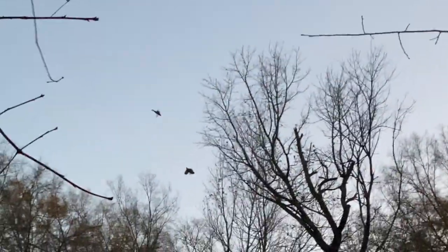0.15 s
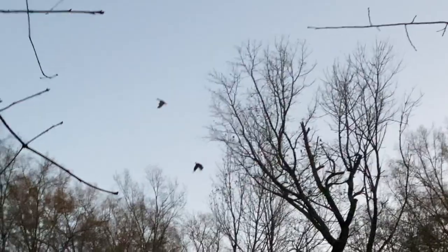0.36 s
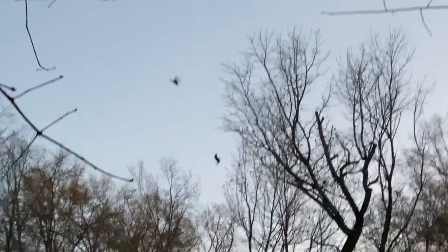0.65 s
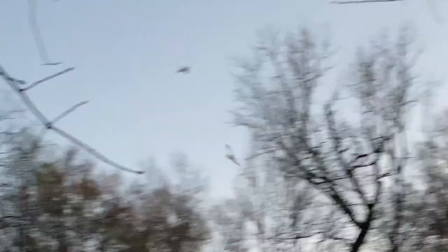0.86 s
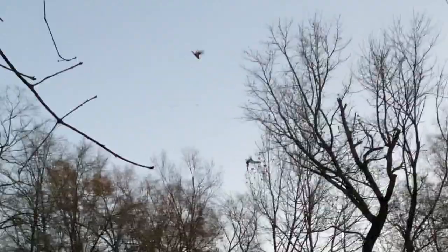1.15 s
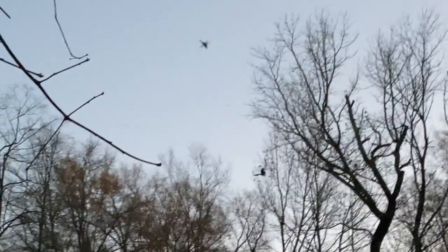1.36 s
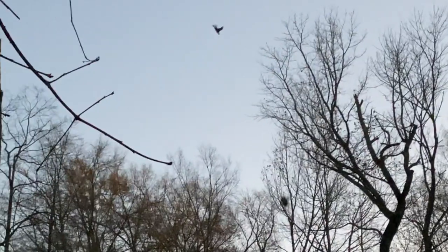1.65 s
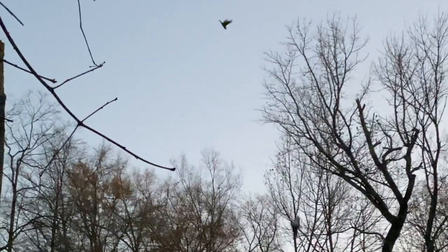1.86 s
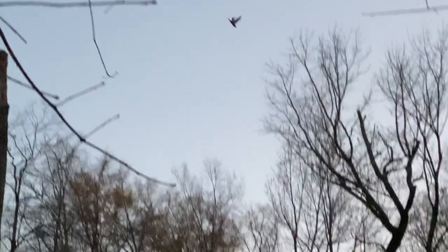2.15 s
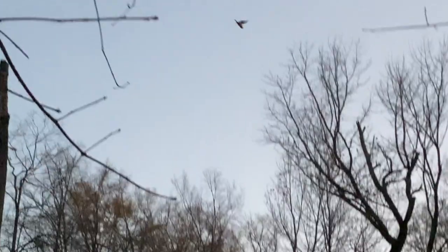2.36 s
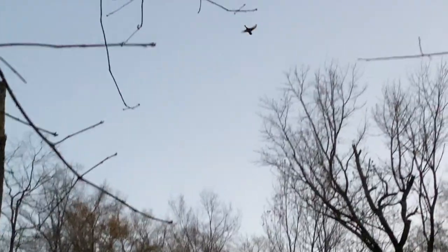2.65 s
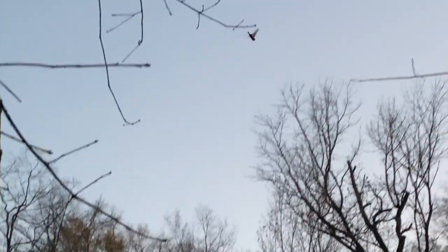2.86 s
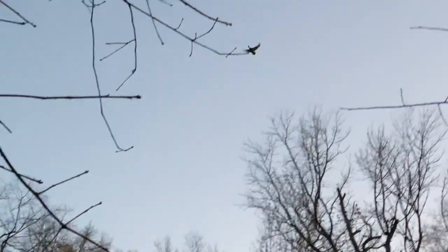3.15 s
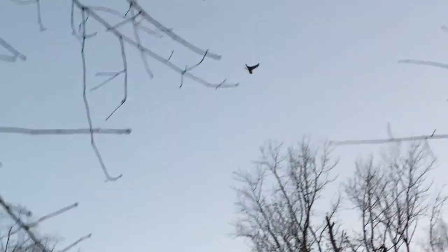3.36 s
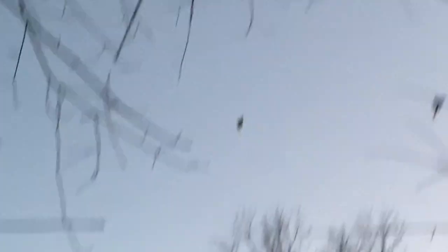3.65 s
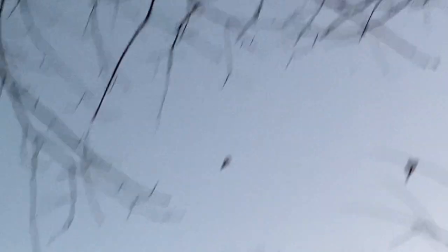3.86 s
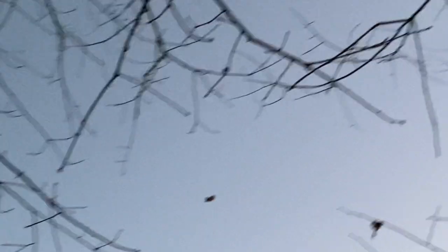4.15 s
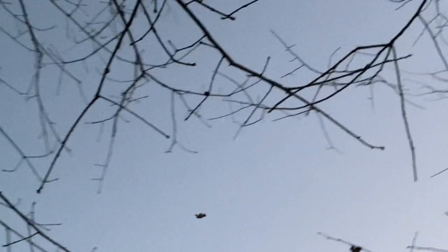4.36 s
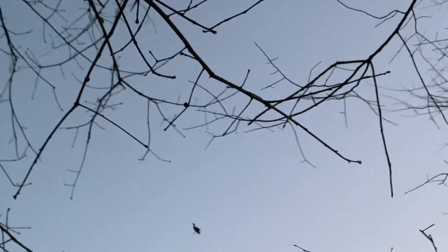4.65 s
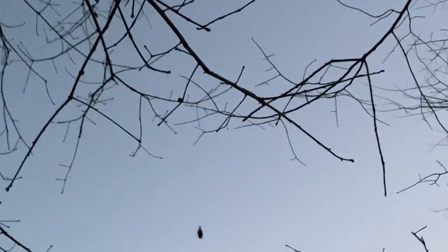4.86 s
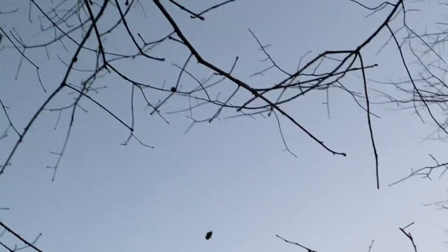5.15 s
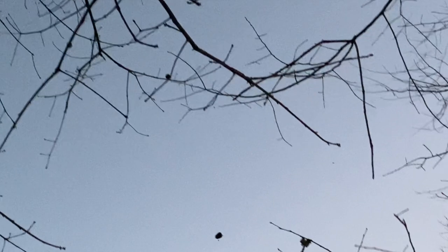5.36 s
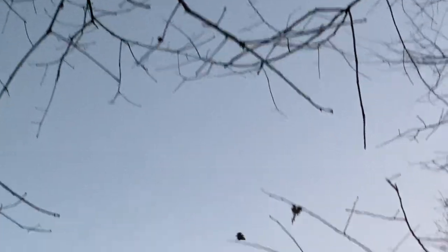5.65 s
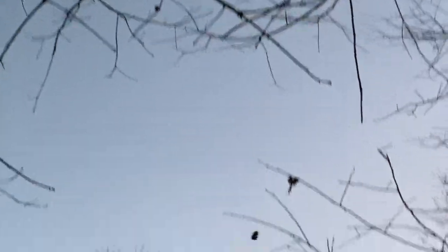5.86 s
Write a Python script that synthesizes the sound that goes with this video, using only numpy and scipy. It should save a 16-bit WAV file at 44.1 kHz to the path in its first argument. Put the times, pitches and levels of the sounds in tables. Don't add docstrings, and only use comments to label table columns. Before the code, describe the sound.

In a bare, flooded wood, five shotgun blasts: one alone, a pause filled by fading rumble, a softer dull shot followed immediately by a deep strong one, then a strong shot and a brighter, thinner one. Trunks and water scatter each into a wide roll that loses its highs first. Quiet hiss beneath; birds flying overhead are not heard. Small stereo microphone in the open.

```python
import sys
import numpy as np
from scipy import signal
from scipy.fft import rfft, irfft, next_fast_len
from scipy.io import wavfile

SR = 44100
rng = np.random.default_rng(int(sys.argv[2]) if len(sys.argv) > 2 else 0)


def wav_out(sig):
    wavfile.write(sys.argv[1], SR, np.round(np.clip(np.atleast_2d(sig).T, -1, 1) * 32767).astype(np.int16))


def natural_amplitude(level_db):
    exponent = np.asarray(level_db, float) / 20
    return 10 ** exponent


N = 264908

# frequency in Hz, density in dB per Hz.
STILL_AIR = [(1200, -38.5), (2200, -10), (3500, 2.5), (4600, -8), (6000, -9), (7500, -28.5), (9500, -39.5)]
# frequency in Hz, density in dB per Hz.
ROLL_COLOUR = [(25.0, -24.2), (50.0, -9.7), (120.0, -0.6), (200.0, -8.7), (450.0, -8.4), (760.0, -13.0),
               (1200.0, -16.1), (1700.0, -20.6), (2600.0, -26.9), (3600.0, -24.8), (4700.0, -34.5),
               (6000.0, -38.1), (8000.0, -43.0), (10000.0, -48.0)]
# frequency in Hz, shared share from 0 to 1.
COHERENCE = [(30, 0.4), (70, 1), (130, 0.91), (250, 0.22), (600, 0.29), (1200, 0.7), (1800, 0), (2500, 0),
             (3500, 0), (4000, 0.3), (4500, .85)]
# frequency in Hz, left minus right in dB.
ROLL_BALANCE = [(60, -3.1), (130, 1), (300, -1), (900, -1.5), (1500, -1), (2400, 9), (3300, -1),
                (4000, -5.5)]
# frequency in Hz, fade in dB/s.
FADE = [(60.0, 6.2), (150.0, 7.9), (700.0, 11.8), (1500.0, 17.4), (2750.0, 27.4), (5400.0, 47.5),
        (9000.0, 56.4)]
# start in seconds, level in dB, age in seconds at which it has
# the plain colour, gain drop in dB.
ROLLS = [
    (-2.0, -4.4, 0.06, 0.1),
    (0.094, 0.1, 0.26, 20.4),
    (2.918, 0.9, 0.04, 7.0),
    (3.127, -13.8, 0.4, 12.4),
    (4.61, -8.8, 0.12, 7.3),
    (4.854, -7.0, 0.22, 12.2),
]
# start in seconds, level in dB, own fade in dB/s, freshness in
# seconds, # swell in dB/s.
SCATTER = [(0.082, -9.0, 45.0, -0.3, 2600.0), (0.097, 9.6, 222.0, 0.07, 5402.0),
           (0.139, -5.4, 152.0, 0.35, 2929.0), (0.288, -0.8, 113.0, -0.58, 4107.0),
           (0.381, -5.9, 119.0, -0.44, 682.0), (0.48, 2.3, 112.0, -0.28, 3119.0),
           (0.668, -6.5, 13.0, 0.02, 4111.0), (0.793, -8.5, 1.0, 0.04, 78.0),
           (1.1, -10.4, 179.0, -0.32, 4008.0), (2.921, 3.9, 1041.0, 0.1, 4115.0),
           (3.127, 19.0, 800.0, -0.15, 5678.0), (3.147, 1.0, 77.0, 0.27, 3011.0),
           (3.178, -0.5, 293.0, 0.04, 939.0), (3.325, 1.7, 246.0, -0.15, 3434.0),
           (3.619, -3.8, 21.0, -0.24, 164.0), (3.877, -5.4, 25.0, -0.54, 26.0),
           (4.612, 17.8, 845.0, 0.03, 4946.0), (4.631, -2.0, 35.0, 0.11, 4017.0),
           (4.842, 1.5, 100.0, -0.4, 500.0), (4.857, 12.7, 236.0, 0.2, 5841.0),
           (4.902, 1.6, 35.0, 0.12, 4095.0), (4.985, 4.6, 602.0, -0.02, 3781.0),
           (5.278, -5.3, 10.0, -0.23, 139.0), (5.468, -1.7, 13.0, -0.4, 98.0)]
# blast in seconds, lead in seconds, frequency in Hz, width in Hz,
# level in dB.
SWELLS = [
    (.094, 0.024, 3700, 600, -45),
    (2.92, 0.027, 3420, 500, -49.5),
    (4.6095, .06, 4000, 40, -54),
]
# start in seconds, boom in dB, bottom of boom in Hz, top of boom in Hz,
# crack ring in dB.
BLASTS = [
    (.094, -4.5, 50.5, 200, -6),
    (2.918, -10.5, 57, 480, -20.5),
    (3.1272, -4, 42, 353, -15.5),
    (4.6099, -5, 80, 290, -10),
    (4.854, -5.5, 250, 594, -6.5),
]
# left minus right in dB, one per blast.
BLAST_PAN_DB = [3.5, -1.5, 3.5, 0.6, -4]
# start in seconds, boom in dB,
# bottom of boom in Hz, top of boom in Hz, crack ring in dB.
SLAPS = [(0.122, -29.5, 99.6, 300, -11), (.146, -12.5, 200, 608, -23), (.287, -11.5, 250, 510, -37),
         (0.667, -15.5, 59.6, 316, -22.5), (2.995, -21.5, 81.4, 488, -23), (3.032, -12, 90, 250, -31),
         (3.183, -15, 200, 780, -17), (3.596, -15, 150, 915, -23), (4.621, -24.5, 101, 299, -11.5),
         (4.858, -3, 34, 170, -30), (4.903, -5, 250, 800, -16.5), (4.986, -21, 144.6, 600, -21)]
# centre in Hz, width in Hz, level in dB.
CRACK_RINGS = [(1200, 250, 11.5), (3200, 2000, -13.5), (4300, 880, -17), (8400, 3600, -29.5)]
# from in Hz, to in Hz.
SUM_GAPS = [(6520, 6900), (9130, 10500), (9400, 10500)]
# from in Hz, to in Hz.
DIFFERENCE_GAPS = [(5280, 5660), (7720, 8250)]

STEP = 32
STILL_AIR_DB = -77.3
RECOVER_DB_PER_S = 32.6
LOW_LUMPS = .15
LOW_LEAD_S, HIGH_LAG_S, HIGH_TURN = .00082, .0004, .18
SPLIT_HZ, SHARED_HZ = 1950, 4700
LAG_CYCLES, LAG_TURN = 1.4, 1.38
CEILING, CUTOFF_HZ = .95, 9720


def at_hz(points, hz):
    table = np.array(points)
    return np.interp(np.log(hz), np.log(table[:, 0]), table[:, 1])


def drift(rate_hz):
    pole = np.exp(-2 * np.pi * STEP * rate_hz / SR)
    noise = rng.standard_normal(N // STEP + 2001)
    slow = signal.lfilter([1], [1, -2 * pole, pole * pole], noise)[2000:]
    return slow / slow.std()


def two_microphones(spectrum, hz):
    low = hz < SPLIT_HZ
    left = np.exp(-2j * np.pi * (hz * HIGH_LAG_S - HIGH_TURN) * ~low)
    right = np.exp(-2j * np.pi * hz * LOW_LEAD_S * low)
    return spectrum * np.array([left, right])


def band_pass(x, order, low_hz, high_hz):
    return signal.sosfilt(signal.butter(order, [low_hz, high_hz], "band", fs=SR, output="sos"), x)


def returning_db(t, hz):
    fade = at_hz(FADE, hz)
    s, db, plain_s, drop_db = np.array(ROLLS).T[:, :, None]
    age = t - s
    drop_left_db = np.maximum(drop_db - RECOVER_DB_PER_S * age, 0)
    gain_db = -np.max(np.where(age > 0, drop_left_db, 0), axis=0)
    roll_db = db - fade * (np.maximum(age, 0) - plain_s) + gain_db
    roll_power = np.sum((age > 0) * natural_amplitude(2 * roll_db), axis=0)

    s, db, own_fade, fresh_s, swell = np.array(SCATTER).T[:, :, None]
    age = t - s
    loss_db = np.where(age > 0, (fade + np.abs(own_fade)) * age, -np.abs(swell) * age)
    burst_power = np.sum(natural_amplitude(2 * (db + fade * fresh_s - loss_db)), axis=0)
    return 10 * np.log10(roll_power + burst_power)


def roll(lumps_db, flutter_db, boom_wait_s):
    t = np.arange(N // STEP + 1) * STEP / SR
    starts = np.array([-1] + [blast[0] for blast in BLASTS])
    since = t - starts[np.searchsorted(starts, t) - 1]
    size = next_fast_len(N)
    hz_all = np.arange(size // 2 + 1) * SR / size
    shared = [irfft(two_microphones(rfft(rng.standard_normal(size)), hz_all), size)[:, :N] for _ in range(2)]
    own = rng.standard_normal((2, 2, N))
    out = 0
    together = drift(9.0)
    edges = 24 * 2 ** (np.arange(37) / 4)
    for k, (low, high) in enumerate(zip(edges, edges[1:])):
        hz = np.sqrt(low * high)
        apart = hz < SHARED_HZ
        alike = np.clip(at_hz(COHERENCE, hz), 0, 1) if apart else 1
        mix = np.sqrt(alike) * shared[k % 2] + np.sqrt(1 - alike) * own[k % 2]
        run_in = mix[:, -8192:]
        band = band_pass(np.hstack([run_in, mix]), 3, low, high)[:, 8192:]
        flutter = flutter_db * (1 + LOW_LUMPS * (hz < 900)) * drift(6.7)
        level_db = returning_db(t, hz) + at_hz(ROLL_COLOUR, hz) + lumps_db * together + flutter
        wait = 1 - np.exp(-(since * hz / (100 * boom_wait_s)) ** 4)
        still_air = natural_amplitude(STILL_AIR_DB + at_hz(STILL_AIR, hz) + 7.5)
        gain = np.hypot(natural_amplitude(level_db) * wait, still_air)
        side = natural_amplitude(apart * at_hz(ROLL_BALANCE, hz) / 2 * np.array([[1], [-1]]))
        out = out + band * side * np.interp(np.arange(N) / STEP, np.arange(len(t)), gain)
    return out


def swells():
    out = np.zeros((2, N))
    for s, lead_s, hz, width_hz, db in SWELLS:
        end, size = round(s * SR), round(lead_s * SR)
        noise = rng.standard_normal((2, 4096))
        narrow = band_pass(noise, 2, hz - width_hz / 2, hz + width_hz / 2)
        swell = np.sin(np.linspace(0, np.pi / 2, size))
        out[:, end - size:end] += natural_amplitude(db) * narrow[:, -size:] / narrow.std() * swell
    return out


def bang(boom_db, bottom_hz, top_hz, crack_db, pan_db, size=8192):
    hz = np.maximum(np.arange(size // 2 + 1), 1) * SR / size
    sweep = np.exp(-2j * np.pi * (LAG_CYCLES * np.log(hz / 130) + LAG_TURN - hz * .0009))
    colour = (hz / 100) ** -.55 / (1 + (hz / top_hz) ** 3) / (1 + (bottom_hz / hz) ** 3)
    lean = natural_amplitude(pan_db / 2 * np.array([[1], [-1]]))
    boom = irfft(two_microphones(colour * sweep, hz)) * lean

    rings = sum(natural_amplitude(db) * np.exp(-2 * ((hz - centre) / width) ** 2) for centre, width, db in CRACK_RINGS)
    splinters = rng.standard_normal(size) * np.exp(-np.arange(size) / (0.001 * SR))
    splinters[round(.0022 * SR)] += 9.0
    crack = irfft(two_microphones(rings * rfft(splinters), hz))
    both = natural_amplitude(boom_db) * boom / np.abs(boom).max() + natural_amplitude(crack_db) * crack / np.abs(crack).max()
    return np.roll(both, 64, axis=1)


def bangs():
    out = np.zeros((2, N + 8192))
    pans_db = BLAST_PAN_DB + [0] * len(SLAPS)
    for (s, *shape), pan_db in zip(BLASTS + SLAPS, pans_db):
        one = bang(*shape, pan_db)
        start = round(s * SR) - 64
        out[:, start:start + one.shape[1]] += one
    return out[:, :N]


def scene():
    return bangs() + roll(lumps_db=1.0, flutter_db=1.38, boom_wait_s=0.044) + swells()


def drop_gaps(x, gaps, depth_db):
    size = next_fast_len(N)
    hz = np.arange(size // 2 + 1) * SR / size
    keep = 1 / (1 + (hz / CUTOFF_HZ) ** 150)
    for low, high in gaps:
        inside = (np.tanh((hz - low) / 45) - np.tanh((hz - high) / 45)) / 2
        keep *= natural_amplitude(depth_db * inside)
    return irfft(rfft(x, size) * keep, size)[:N]


def band_limit(x):
    return signal.sosfilt(signal.butter(12, 10040, fs=SR, output="sos"), x)


def record(dry):
    left, right = CEILING * np.tanh(dry / CEILING)
    mid = drop_gaps((left + right) / 2, SUM_GAPS, depth_db=-15.0)
    side = drop_gaps((left - right) / 2, DIFFERENCE_GAPS, depth_db=-21.5)
    return band_limit(np.array([mid + side, mid - side]))


dry = scene()
out = record(dry)
wav_out(out)
```